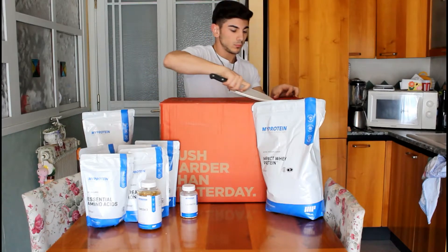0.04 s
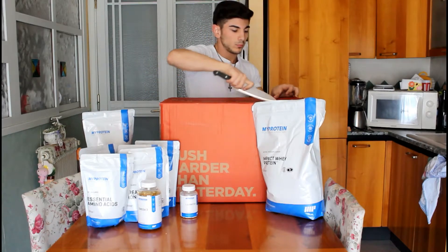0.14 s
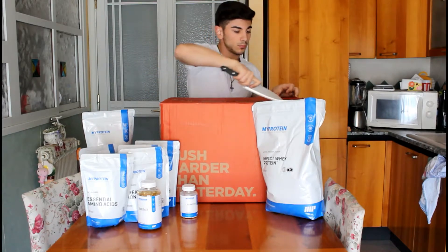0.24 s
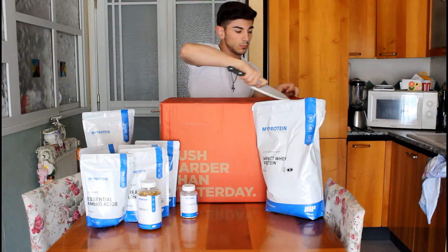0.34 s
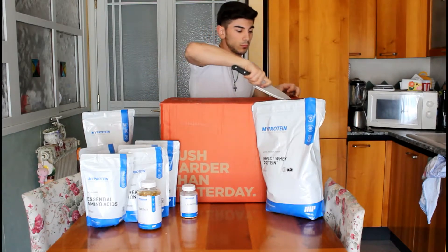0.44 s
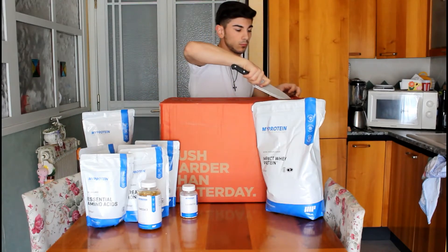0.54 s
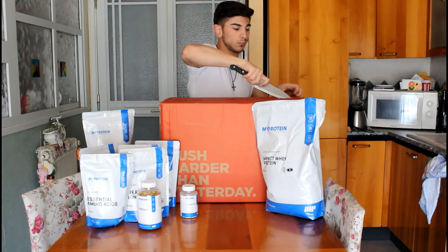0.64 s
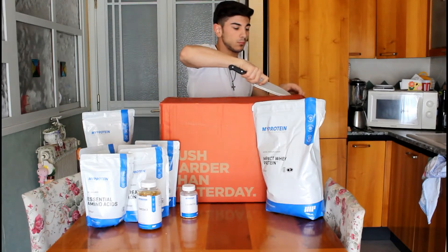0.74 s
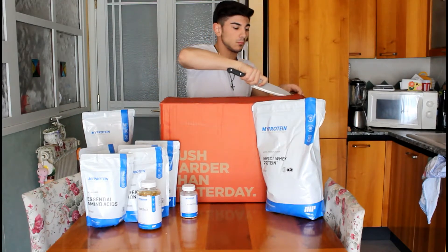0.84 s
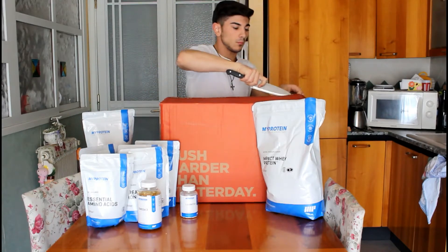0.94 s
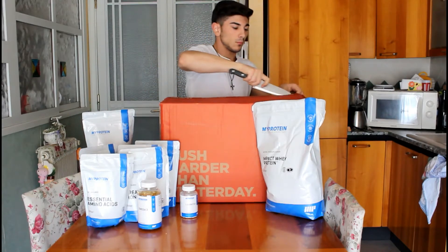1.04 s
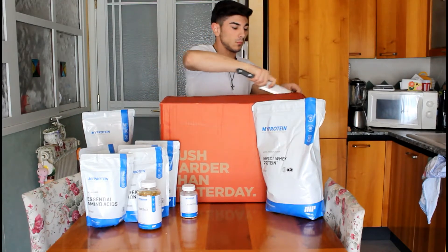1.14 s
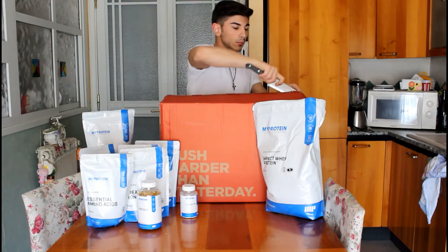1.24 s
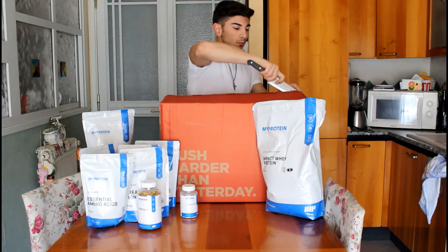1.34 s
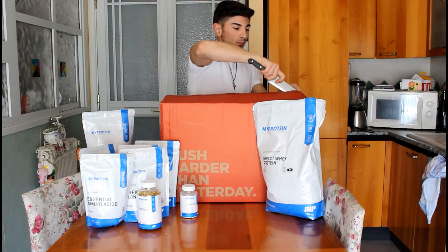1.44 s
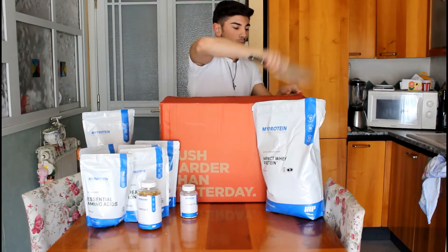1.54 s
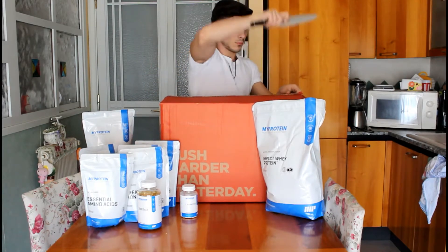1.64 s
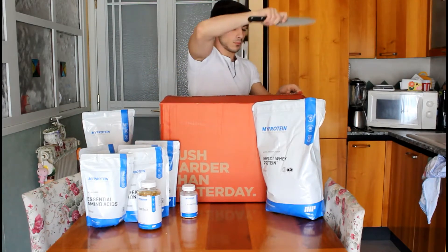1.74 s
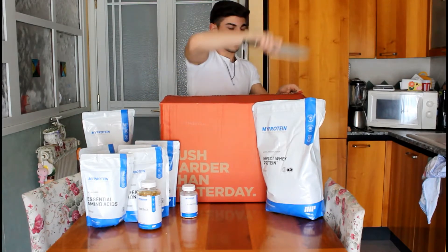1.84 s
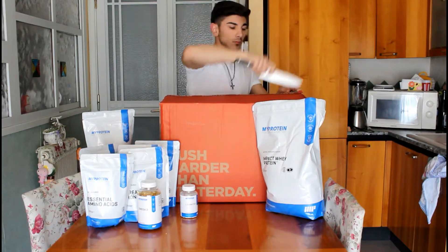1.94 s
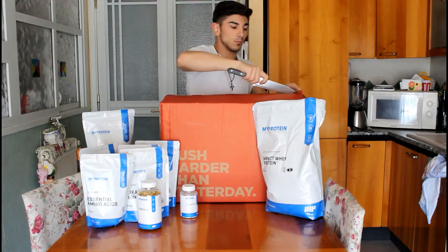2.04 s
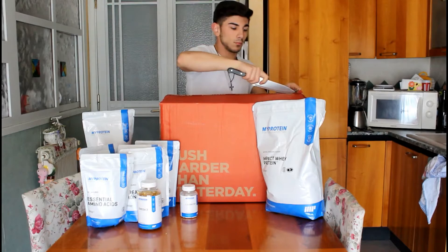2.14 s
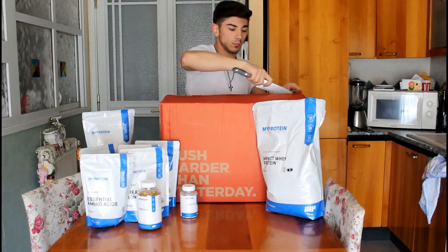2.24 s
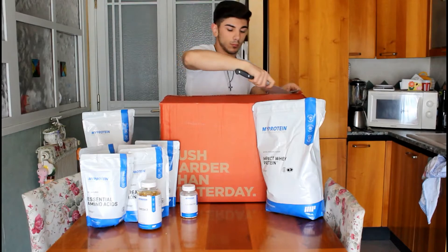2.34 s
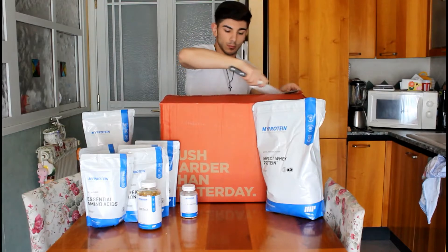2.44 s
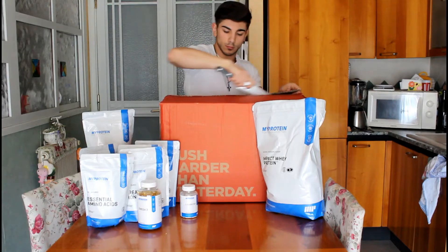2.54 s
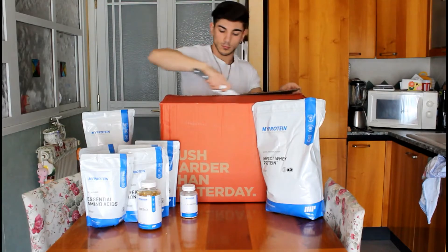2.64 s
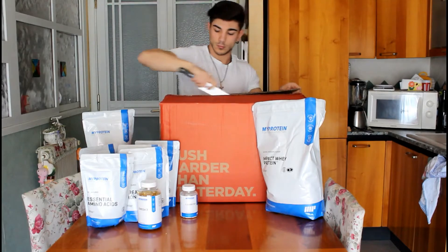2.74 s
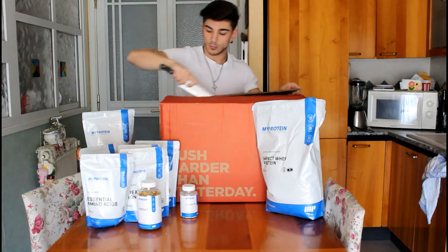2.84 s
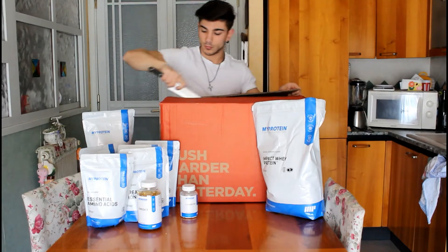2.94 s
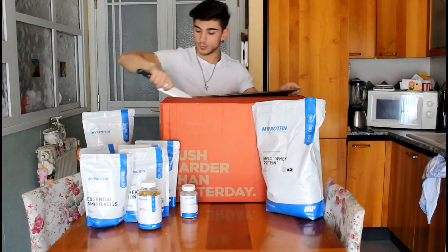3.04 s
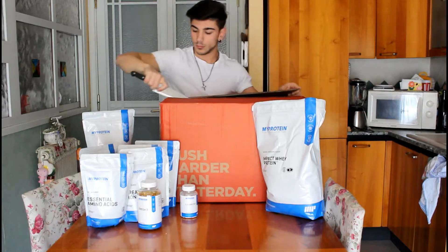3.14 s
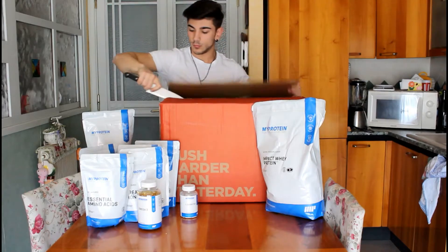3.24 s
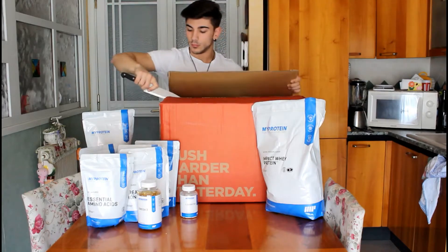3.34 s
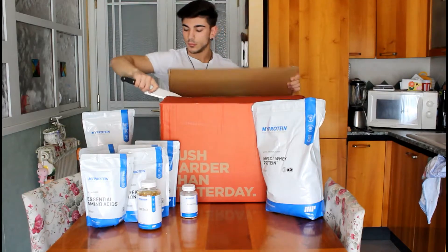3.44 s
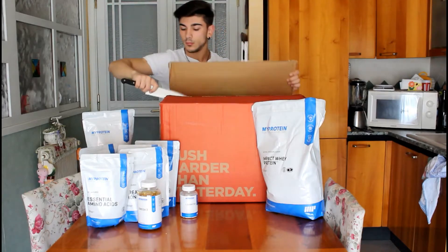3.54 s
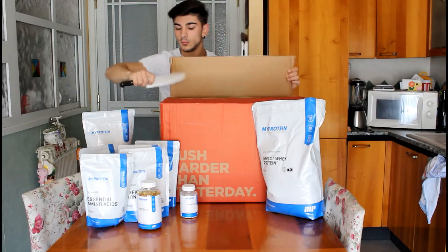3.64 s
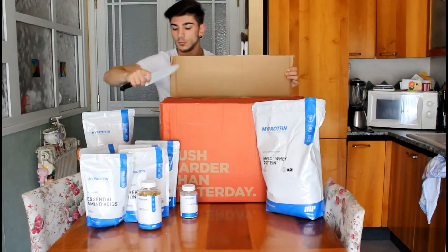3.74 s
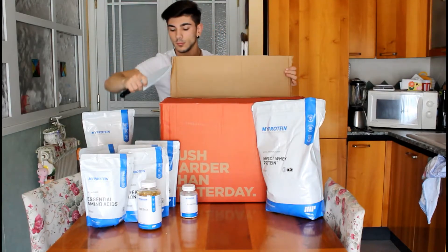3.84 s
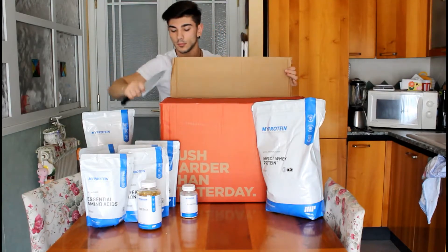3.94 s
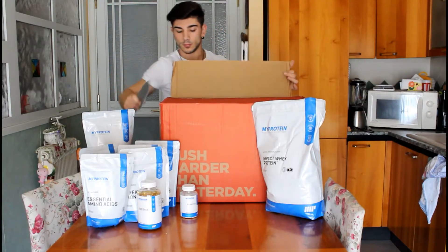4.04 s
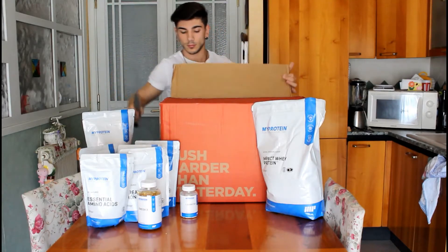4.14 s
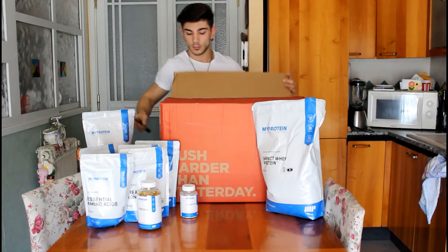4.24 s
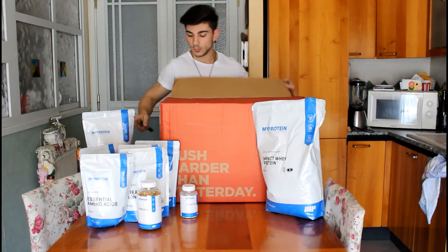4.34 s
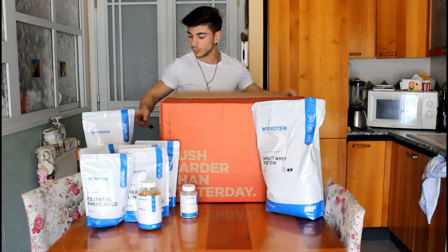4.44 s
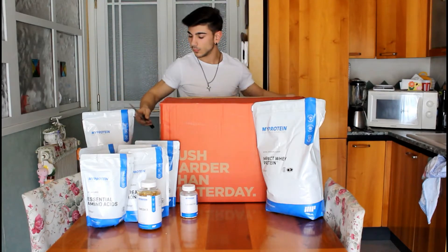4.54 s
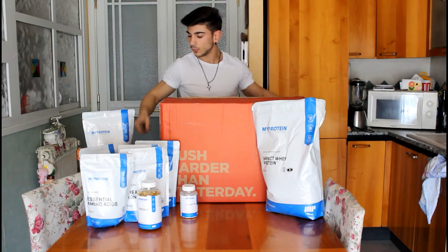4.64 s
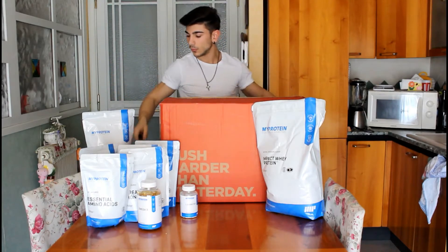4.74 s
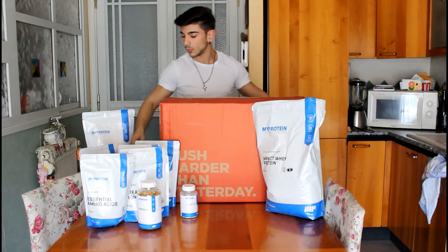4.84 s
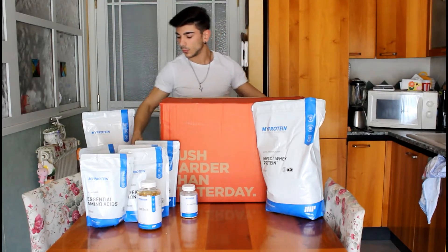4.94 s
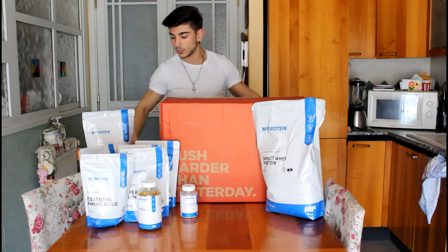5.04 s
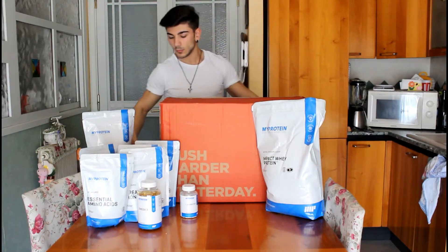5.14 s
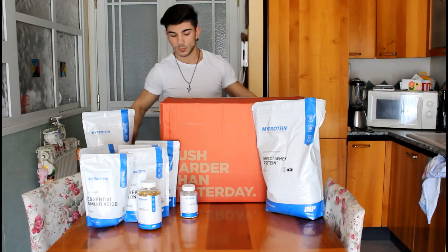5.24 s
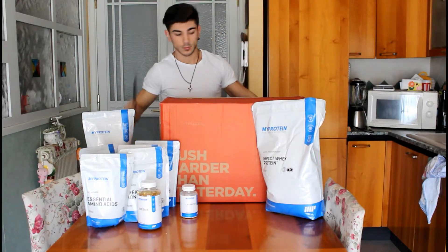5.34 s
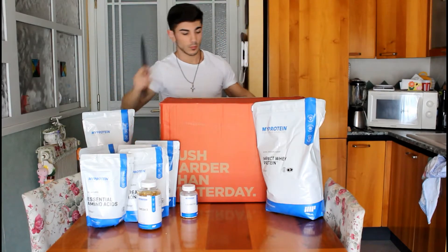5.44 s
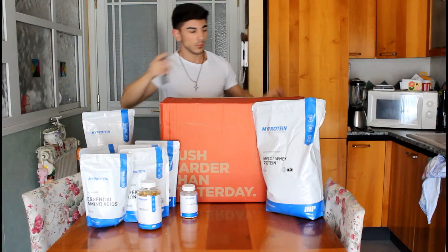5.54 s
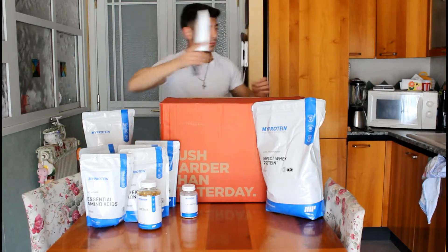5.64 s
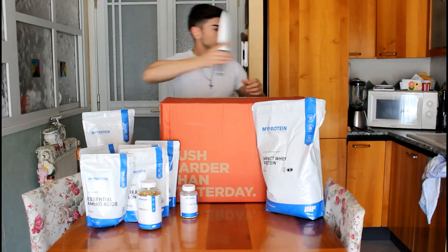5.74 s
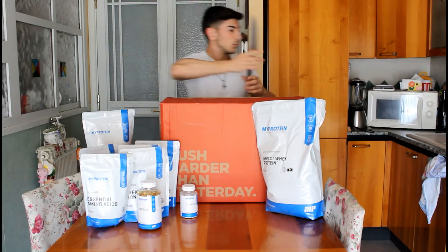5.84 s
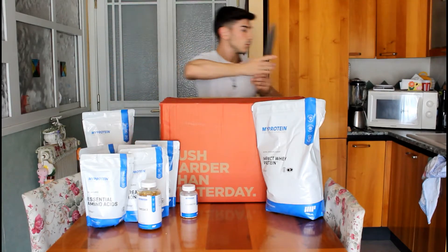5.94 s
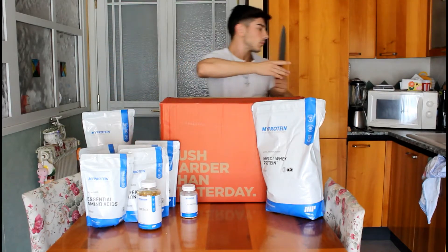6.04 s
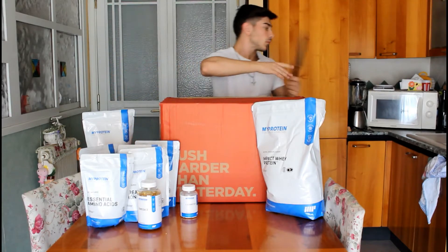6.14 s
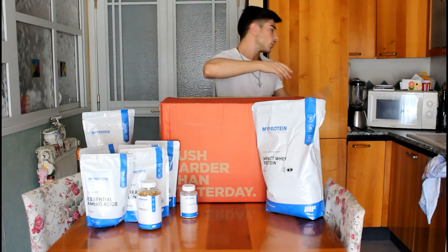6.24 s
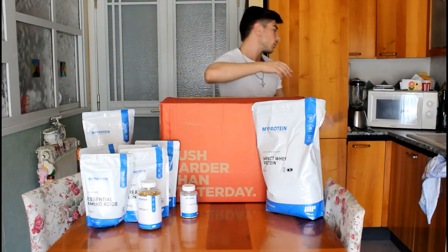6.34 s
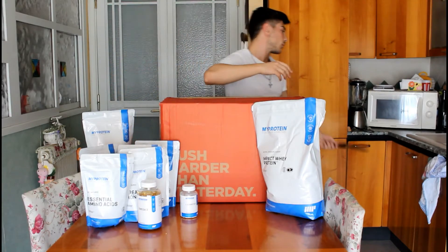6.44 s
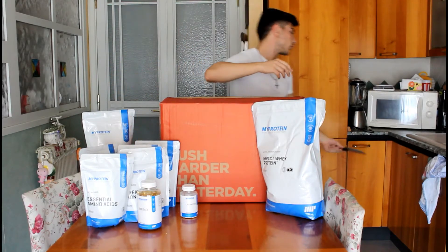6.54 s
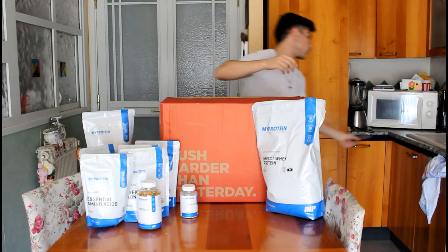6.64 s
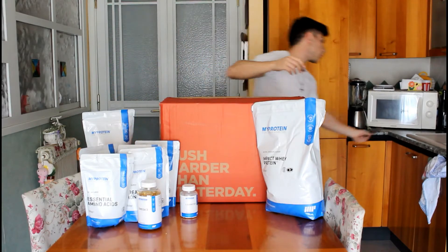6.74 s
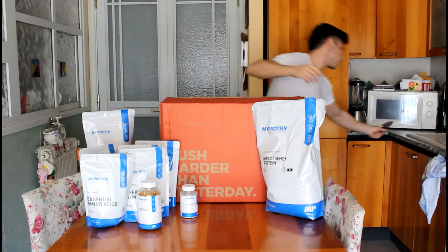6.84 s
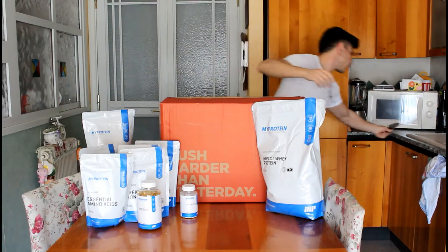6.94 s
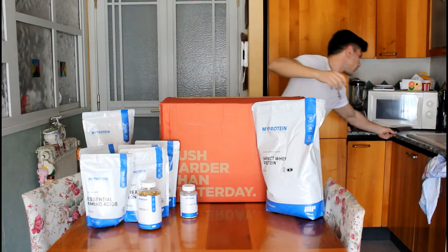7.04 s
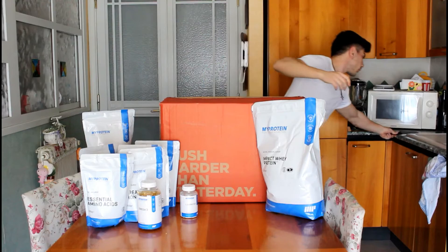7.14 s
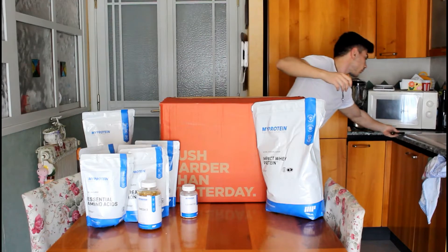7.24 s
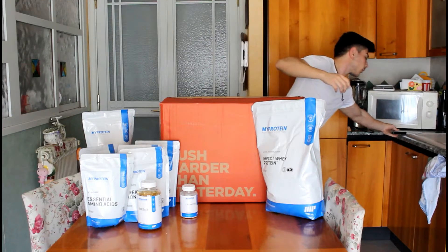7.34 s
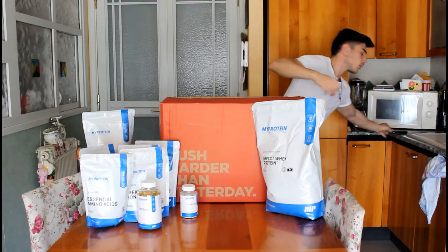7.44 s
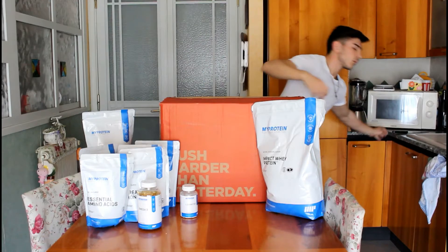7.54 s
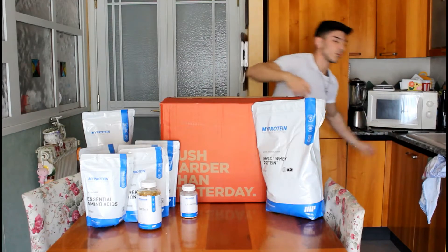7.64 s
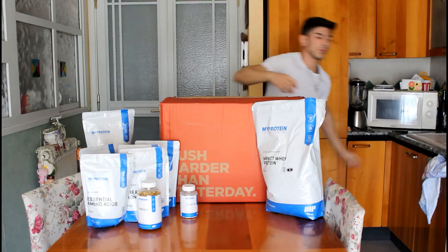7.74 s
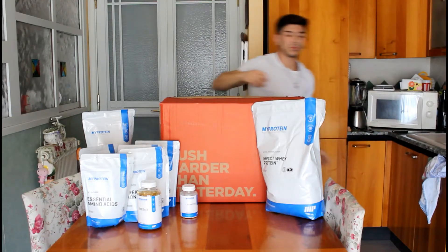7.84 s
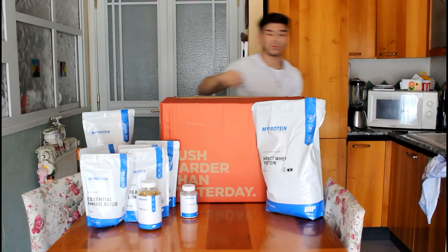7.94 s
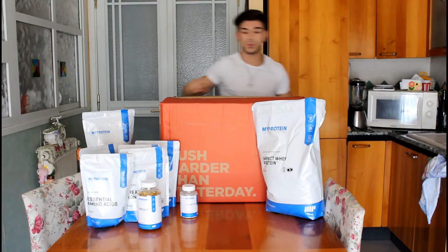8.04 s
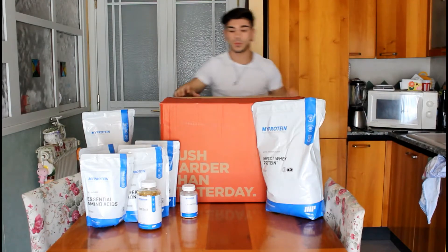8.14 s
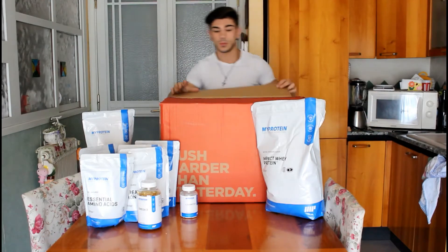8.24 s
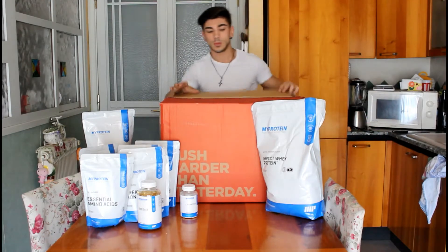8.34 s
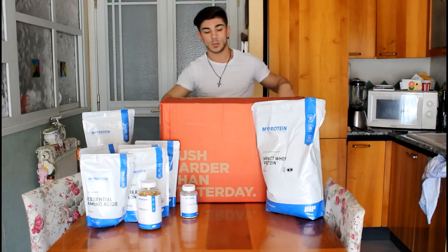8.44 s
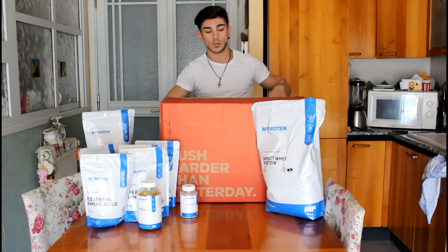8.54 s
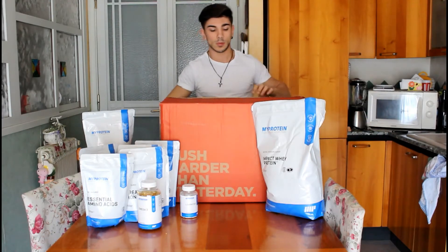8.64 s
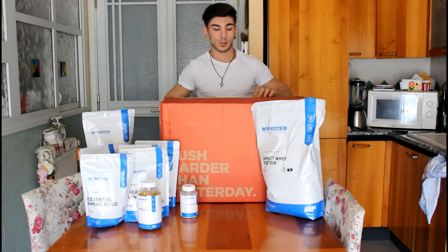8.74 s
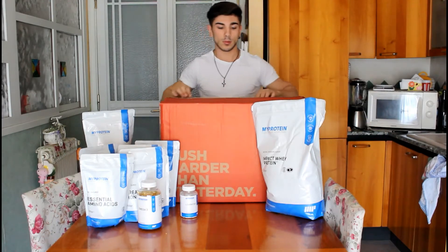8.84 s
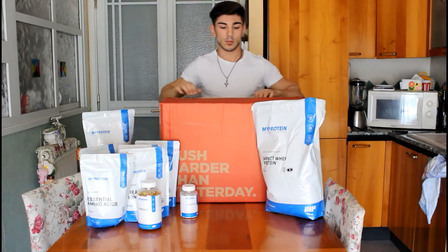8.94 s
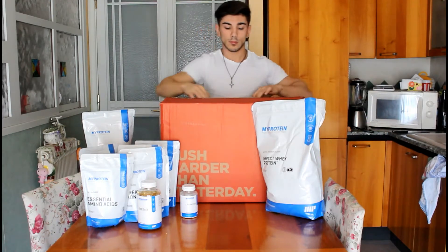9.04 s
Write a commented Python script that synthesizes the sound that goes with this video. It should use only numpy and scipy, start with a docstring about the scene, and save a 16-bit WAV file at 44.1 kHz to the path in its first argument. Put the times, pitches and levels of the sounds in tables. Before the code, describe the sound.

Scratchy cutting and hollow knocks on a cardboard box, followed by a knife rattling down on a countertop and a flap folding back.

```python
"""First comes the scratch of a kitchen knife working into the tape of a big cardboard box. It stabs,
slits the seam, and a flap is lifted; each crackle and blow makes the cardboard panels ring.
The person steps aside with rustling clothes, lays the knife clattering on the counter and folds the
flap back, all echoing off the hard kitchen walls. An appliance hums; an engine outside swells and fades."""
import sys
import numpy as np
from scipy import signal
from scipy.fft import rfft, irfft, next_fast_len
from scipy.io import wavfile
from scipy.ndimage import uniform_filter1d

SR = 44100
rng = np.random.default_rng(int(sys.argv[2]) if len(sys.argv) > 2 else 0)


def transcribe(signal):
    """Save signal, clipped to [-1, 1], as a 16-bit WAV file at the path in sys.argv[1]."""
    frames = np.atleast_2d(signal).T
    limited = np.clip(frames, -1, 1)
    pcm = np.round(limited * 32767).astype(np.int16)
    wavfile.write(sys.argv[1], SR, pcm)


N = 400993
RING_SIZE, ECHO_SIZE = 8192, 32768  # samples
RING_HZ = np.fft.rfftfreq(RING_SIZE, 1 / SR) + 1

# Blows: (time [s], level [dB], boom [dB], treble [dB], tilt [dB/octave], crunch length [s])
# Level is for the middle pitches, before gain_db is added; boom and treble are relative to it.
# the point punches through the tape
STABS = [(0.409, -11.5, 0.5, -3, 0.5, 0.0051), (0.415, -8, -12, -8, -1, 0.0038),
         (0.445, -17.5, -6, -7, 4, .0044), (1.102, -15, -3.5, 2.5, 1, 0.004),
         (1.109, -10, -17, -13, 1, .012)]
# the edge snags and tears free
TEARS = [(1.561, -6.5, -7, -8.5, -4, 0.0083), (2.25, -19.5, -15, -3, -5, 0.004),
         (2.56, -12.5, 5, -10, 5.5, 0.017), (2.65, -10, 6, -9, 1, .012), (2.895, -12, 9.5, -4, -2, 0.011),
         (2.998, -15, -3, -15, -2, 0.017), (3.133, -20, -1, -6, -9.5, 0.011)]
# hand and knife knock dully on the box
KNOCKS = [(0.734, -18.5, -3, -8.5, -8, .0088), (0.895, -20, -28, -10, -2, 0.0012),
          (1.904, -32, -13, -24, -0.5, 0.0064), (2.043, -12.5, -3.5, -13, -9.5, .006),
          (2.396, -9.5, -3, -6, 8, 0.012)]
# a flap thumps against the box
FLAP_THUMPS = [(3.614, -39, 11.4, -2, 2, .007), (8.177, -12, 6, -14, -1, 0.0044),
               (8.202, -18.5, 2.2, -3.5, 0.36, 0.003), (8.465, -25.5, 8.4, 0, 2.3, 0.014),
               (8.817, -24.5, 4.7, -11, -1.7, 0.013)]
# the knife's handle clacks on the counter
HANDLE_CLACKS = [(7.178, -3.5, -9, -8.5, 7.5, .005), (7.212, -17, -1, -9, 9, 0.0028),
                 (7.275, -14.5, -4, -12, 9, 0.049), (7.436, -9, -13, -23, -1.5, 0.038)]
# shoes step and shuffle
STEPS = [(4.924, -31, -10, -19, -4.5, 0.016), (5.568, -23.5, -7, -4, 8.5, .008),
         (5.897, -17, -10.5, -14.5, 3.5, 0.01), (6.192, -24.5, 1.5, -20, 4.5, .011),
         (6.62, -34, -5, -31, 2, 0.0103), (6.767, -29.5, 6.5, -24, -4, 0.0088),
         (7.938, -23, -6, -25, -3, 0.013)]

# the blade rattles to rest: (time [s], level before gain_db [dB], treble [dB])
BLADE_BOUNCES = [(7.329, -7, -4), (7.362, -15, -6.5), (7.467, -9, -5), (7.513, -9, -5), (7.585, -12, -11.5)]

# Rubbing strokes: (start [s], hold [s], level [dB], treble [dB])
# the point works into the tape
POINT_STROKES = [(0, 0.36, -39.5, -5.5), (0.3, 0.15, -38, 0.5), (0.41, 0.031, -21, 2.5),
                 (0.51, 0.16, -28.5, -11.5), (0.75, 0.088, -38, -1), (0.94, 0.17, -39.5, -1.5),
                 (1.12, 0.095, -16.5, -9.5), (1.2, 0.055, -18, -4.5), (1.54, 0.017, -22.5, -14),
                 (1.565, 0.04, -27, 5.5)]
# the edge slits along the seam
SLIT_STROKES = [(2.243, 0.061, -19, -6.5), (2.34, 0.29, -26, -6.5), (2.5, 0.099, -16, -6),
                (2.58, 0.16, -20, -4.5), (2.74, 0.28, -23.5, -4.5), (2.895, 0.13, -19, -6.5),
                (3.04, 0.26, -27, -3), (3.27, 0.046, -23.5, -8), (3.32, 0.054, -40.5, 3)]
# a flap slides as it is lifted and later folded back
FLAP_STROKES = [(3.48, 0.24, -43, -2.5), (3.69, 0.068, -42.5, 3), (3.79, 0.16, -53, 4),
                (4.1, 0.059, -43, 1), (4.25, 0.087, -45.5, 0.5), (4.32, .06, -40.5, 1),
                (4.56, 0.43, -60.5, 7), (8.15, .03, -37.5, 1), (8.177, .045, -32, -1.5),
                (8.22, 0.15, -33, -4), (8.345, 0.054, -31, 0), (8.42, 0.096, -36.5, -1),
                (8.52, 0.095, -50, 4), (8.76, .06, -40, 0), (8.83, 0.063, -29.5, -1),
                (8.93, 0.104, -42.5, -1), (9.05, 0.036, -37, -2)]
# clothes rustle
CLOTH_STROKES = [(5.43, 0.099, -46.5, -2.5), (5.5, 0.11, -36, 2), (5.62, .13, -44, 3), (5.75, 0.25, -39, 0),
                 (6.225, 0.037, -32.5, -10.5), (6.3, 0.13, -47, -7)]

# Tone colours, how strong each thing sounds from low to high: (frequency [Hz], level [dB])
CARDBOARD_COLOUR = [(50, -82), (95, -20), (135, -16), (180, -9), (320, -12.5), (600, -14.5), (1400, -11.5),
                    (2200, -17), (3300, -26), (6500, -29), (10300, -37), (12500, -44.5), (15000, -61)]
COUNTER_COLOUR = [(47, -46), (80, -21), (114, -13.5), (285, -15.5), (493, -10), (538, -5.5), (763, -0.5),
                  (1160, 2), (2230, 2.5), (7780, -12.5), (9890, -12.5), (11800, -14), (15000, -39)]
SHOE_COLOUR = [(60, -35), (150, -5.5), (300, 0), (800, -0.5), (1500, -7), (2500, -14.5), (6000, -15),
               (10000, -25), (15000, -44)]
CLOTH_COLOUR = [(80, -45), (250, -12), (1000, -2), (2500, -7), (4500, 3), (7000, 7.5), (10500, -2.5),
                (15000, -22)]
ROOM_TONE_COLOUR = [(15, -25), (25, -22), (40, 6.5), (54, -19), (85, -8.5), (139, -1.5), (237, -4.5),
                    (380, -3), (570, -14), (2130, -19), (6200, -29.5), (6650, -26), (7280, -33.5),
                    (9770, -36), (15000, -49)]

# The notes at which each thing rings: (frequency [Hz], width [Hz], boost [dB])
PANEL_NOTES = [(159, 8.7, 11.5), (180.3, 15, 12.5), (198, 24, 14), (267, 26, 5.5), (278, 37, 3.5),
               (502.4, 15, 9), (628, 150, 8), (1113, 30, 1.5), (1295, 65, 1.5)]
FLAP_NOTES = [(181, 18, 3.4), (198.6, 37, 17), (295, 25, 2.2), (660, 160, 4)]
BLADE_NOTES = [(491, 18, 6.2), (655, 14, 1.8), (777, 110, 3.4), (975, 12, 2.4), (1700, 53, 2.9),
               (3933, 46, 6.5), (4800, 62, 6), (5300, 30, 3.7), (5650, 64, 8.5), (6300, 32, 5.7),
               (6750, 58, 12), (8280, 40, 9.1), (8670, 50, 7.4), (9636, 50, 10.5), (10060, 87, 10.4),
               (11600, 60, 10.6), (13300, 50, 17.2), (15122, 50, 18)]

# how long the kitchen echoes: (frequency [Hz], time to fade by 60 dB [s])
ECHO_TIMES = [(100, 0.42), (250, 0.6), (700, 0.78), (2000, 0.65), (5000, 0.7), (9000, 0.5), (15000, 0.081)]
# the appliance's tones: (frequency [Hz], level [dB], waver [Hz])
HUM_TONES = [(134.8, -48.5, 1.27), (181, -67, 2.93), (377, -53, 4.15), (422, -59, 7.4), (6630, -68, 46)]
# the engine idles, swells and fades, then returns: (time [s], firing rate [Hz], level [dB])
ENGINE_IDLE = [(0, 57.4, -49.5), (3.2, 55.2, -54.5)]
ENGINE_SWELL = [(4.3, 54, -53), (4.7, 54.6, -58), (5.14, 55.9, -41), (5.61, 58.7, -39.5), (6.23, 61.4, -29),
                (6.48, 64.1, -34), (6.73, 64.35, -47), (6.9, 64.15, -41), (7.15, 64.0, -49)]
ENGINE_RETURN = [(7.8, 66.77, -55), (8.438, 66.4, -46.5), (9.09, 65.9, -41)]


def box(room):
    """Blows and strokes of the knife ring the cardboard panels; the free flap has notes of its own."""
    panel = CARDBOARD_COLOUR, PANEL_NOTES, room
    flap = CARDBOARD_COLOUR, FLAP_NOTES, room
    return (blows(STABS, *panel, edge_hz=5600, snap=0.61, rise_s=0.0009, gain_db=1.2)
            + blows(TEARS, *panel, edge_hz=13000, snap=0.47, rise_s=0.002, gain_db=-1.3)
            + blows(KNOCKS, *panel, edge_hz=1600, snap=0.57, rise_s=0.0015, gain_db=-1.3)
            + blows(FLAP_THUMPS, *flap, edge_hz=800, snap=0.37, rise_s=0.00093, gain_db=0.5)
            + rub(POINT_STROKES, *panel, clicks_per_s=3000, spread_db=4, slip_hz=67.5, slip_db=2.5,
                  boom_db=-7, attack_s=0.011, release_s=0.012)
            + rub(SLIT_STROKES, *panel, clicks_per_s=3000, spread_db=3.3, slip_hz=135, slip_db=0.5,
                  boom_db=-3, attack_s=0.0091, release_s=0.014)
            + rub(FLAP_STROKES, *flap, clicks_per_s=5000, spread_db=3, slip_hz=50.5, slip_db=3,
                  boom_db=-12.5, attack_s=0.009, release_s=0.034))


def knife_clatter(room, boom_db=-11, tilt_db=-6.5, crunch_s=0.026):
    """The handle lands first, then the blade bounces and rings on the counter."""
    steel = COUNTER_COLOUR, BLADE_NOTES, room
    bounces = [(s, db, boom_db, treble_db, tilt_db, crunch_s) for s, db, treble_db in BLADE_BOUNCES]
    return (blows(HANDLE_CLACKS, *steel, edge_hz=2400, snap=0.34, rise_s=0.00077, gain_db=0.6)
            + blows(bounces, *steel, edge_hz=14000, snap=0.65, rise_s=0.0014, gain_db=-1.87))


def person(room):
    """Shoes strike the floor and cloth rubs, with no ringing notes."""
    return (blows(STEPS, SHOE_COLOUR, [], room, edge_hz=1520, snap=0.75, rise_s=0.00043, gain_db=-0.4)
            + rub(CLOTH_STROKES, CLOTH_COLOUR, [], room, clicks_per_s=7000, spread_db=2,
                  slip_hz=39.5, slip_db=-1, boom_db=-11, attack_s=0.02, release_s=0.024))


def blows(table, colour, notes, room, edge_hz, snap, rise_s, gain_db):
    """Each blow is a snap and a swelling, dying crunch that ring the object and the room."""
    out = np.zeros(N + 2 * ECHO_SIZE)
    t = np.arange(RING_SIZE) / SR
    for start_s, db, boom_db, treble_db, tilt_db, crunch_s in table:
        force = crackle(RING_SIZE, clicks_per_s=5000, spread_db=3.85)
        force *= np.exp(-t / (2 * crunch_s)) * (1 - np.exp(-t / rise_s))
        force /= np.sqrt(np.sum(force ** 2))
        force[0] += snap
        responses = np.array(body(colour, notes, contact_colour(tilt_db, edge_hz)))
        ringing = signal.fftconvolve(force[None], responses, axes=1)[:, :RING_SIZE]
        parts = kitchen_echo(ringing, room)
        # give each part the energy of 10 ms at strength 1, then set its level
        parts *= np.sqrt(.01 * SR / np.sum(parts ** 2, axis=1, keepdims=True))
        hit = sum(amp(db + gain_db + part_db) * part
                  for part_db, part in zip((boom_db, 0, treble_db), parts))
        start = int(start_s * SR)
        out[start:start + len(hit)] += hit
    return out[:N]


def rub(table, colour, notes, room, clicks_per_s, spread_db, slip_hz, slip_db, boom_db,
        attack_s, release_s):
    """Surfaces stick and slip: each stroke presses, holds and lets go, crackling in uneven spurts."""
    out = np.zeros(N + 3 * ECHO_SIZE)
    t = np.arange(ECHO_SIZE) / SR
    boom, middle, treble = body(colour, notes)
    for start_s, hold_s, db, treble_db in table:
        pressure = np.minimum(t / attack_s, 1) * np.exp(-np.maximum(t - hold_s, 0) / release_s)
        clicks = crackle(ECHO_SIZE, clicks_per_s, spread_db)
        spurts = amp(slip_db * wander(slip_hz, ECHO_SIZE))
        response = amp(boom_db) * boom + middle + amp(treble_db) * treble
        ringing = signal.fftconvolve(unit(clicks * spurts) * pressure, response)
        stroke = amp(db) * kitchen_echo(ringing[None, :ECHO_SIZE], room)[0]
        start = int(start_s * SR)
        out[start:start + len(stroke)] += stroke
    return out[:N]


def crackle(length, clicks_per_s, spread_db):
    """Fibres snap at random: many small clicks, a few large."""
    chance, size, sign = rng.random((length, 3)).T
    strength = amp(spread_db * np.minimum(-np.log(1 - size), 4))
    return unit((chance < clicks_per_s / SR) * strength * np.sign(sign - .5) + 1e-9)


def contact_colour(tilt_db, edge_hz, grit_db=-11):
    """A springy contact dies away above edge_hz, leaving only grit; a harder one reaches higher."""
    ratio = RING_HZ / edge_hz
    spring = 1 / ((1 - ratio ** 2) ** 2 + ratio ** 2)
    octaves = np.log2(np.clip(RING_HZ, 350, 3000) / 1000)
    return (spring + amp(grit_db)) * amp(tilt_db * octaves)


def body(colour, notes, contact=1, boom_hz=350, treble_hz=3000):
    """How an object answers a tap, split into boom, middle and treble of equal energy."""
    boost = 1 + sum(amp(db) ** 2 / (1 + (2 * (RING_HZ - hz) / width) ** 2) for hz, width, db in notes)
    gain = amp(read_curve(RING_HZ, colour)) * np.sqrt(boost) * contact
    low = 1 / (1 + (RING_HZ / boom_hz) ** 8)
    high = 1 / (1 + (treble_hz / RING_HZ) ** 8)
    shares = low, (1 - low) * (1 - high), high
    return [unit(ring(gain * np.sqrt(share))) / np.sqrt(RING_SIZE) for share in shares]


def ring(gain):
    """Turn a strength for each frequency into a sound that starts at once and dies away."""
    cepstrum = irfft(np.log(gain + 1e-7))
    # fold the second half onto the first, so nothing sounds before the tap
    cepstrum[1:RING_SIZE // 2] *= 2
    cepstrum[RING_SIZE // 2 + 1:] = 0
    return irfft(np.exp(rfft(cepstrum)))


def kitchen_room(flurry=1.1, flurry_s=0.011, build_s=0.0012):
    """How each octave fades: a flurry off table and cupboards, then a tail whose treble dies first."""
    t = np.arange(ECHO_SIZE) / SR
    hz = np.fft.rfftfreq(ECHO_SIZE, 1 / SR) + 1
    centres_hz = 62.5 * 2. ** np.arange(9)[:, None]
    bands = np.maximum(1 - np.abs(np.log2(hz / centres_hz)), 0)
    tails = np.exp(-np.log(1000) * t / read_curve(centres_hz, ECHO_TIMES))
    fades = (tails + flurry * np.exp(-t / flurry_s)) * (1 - np.exp(-t / build_s))
    fades /= np.linalg.norm(fades, axis=1, keepdims=True)
    return bands.astype(np.float32), fades.astype(np.float32)


def kitchen_echo(sound, room, direct=0.36):
    """The direct sound plus fresh random echoes, as if from its own spot in the room."""
    bands, fades = room
    noise = rng.standard_normal(ECHO_SIZE).astype(np.float32)
    echoes = (irfft(bands * rfft(noise)) * fades).sum(axis=0)
    echoes[0] += direct
    return signal.fftconvolve(sound.astype(np.float32), echoes[None], axes=1) / float(np.hypot(1, direct))


def engine(overtone_db=-16, throb_db=1.0):
    """An engine drones through the walls at its firing rate and, more softly, an octave above."""
    t = np.arange(N) / SR
    times, firing_hz, db = np.vstack([ENGINE_IDLE, ENGINE_SWELL, ENGINE_RETURN]).T
    phase = 2 * np.pi * np.cumsum(np.interp(t, times, firing_hz)) / SR
    level = amp(np.interp(t, times, db) + throb_db * wander(8))
    return np.sqrt(2) * level * (np.sin(phase) + amp(overtone_db) * np.sin(2 * phase))


def appliance_hum(flicker_db=2.6):
    """An appliance hums a few tones, each wavering in loudness and pitch."""
    hum = np.zeros(N)
    for hz, db, waver_hz in HUM_TONES:
        level = amp(db + flicker_db * wander(6.5))
        phase = 2 * np.pi * np.cumsum(hz + waver_hz * wander(25)) / SR
        hum += level * np.sin(phase)
    return np.sqrt(2) * hum


def room_tone(level_db=-42, drift_db=0.133):
    """A soft, low, almost steady rush fills the room."""
    size = next_fast_len(N, True)
    hz = np.fft.rfftfreq(size, 1 / SR) + 1
    spectrum = rfft(rng.standard_normal(size)) * amp(read_curve(hz, ROOM_TONE_COLOUR))
    return unit(irfft(spectrum, size)[:N]) * amp(level_db + drift_db * wander(2.29))


def wander(rate_hz, length=N):
    """A random curve of size about 1 that glides to a new value rate_hz times a second."""
    step = max(int(SR / rate_hz), 1)
    stairs = np.repeat(rng.standard_normal(length // step + 1), step)[:length]
    return unit(uniform_filter1d(stairs, step))


def read_curve(hz, points):
    """Read between (frequency, value) points, with octaves evenly spaced."""
    point_hz, values = np.transpose(points)
    return np.interp(np.log(hz), np.log(point_hz), values)


def amp(db):
    """Turn decibels into a multiplier."""
    return 10 ** (np.asarray(db) / 20)


def unit(x):
    """Scale to an average strength (rms) of 1."""
    return x / np.sqrt(np.mean(x ** 2))


def scene():
    """Box, person and knife sound in one kitchen, over the background."""
    room = kitchen_room()
    return (box(room) + person(room) + knife_clatter(room) + room_tone() + appliance_hum() + engine())[None]


def record(dry, top_hz=15300):
    """Flatten any peak beyond full scale, then cut the highest treble."""
    low_pass = signal.ellip(10, .2, 80, top_hz, fs=SR, output="sos")
    return signal.sosfilt(low_pass, np.clip(dry, -1, 1))


dry = scene()
out = record(dry)
transcribe(out)
```